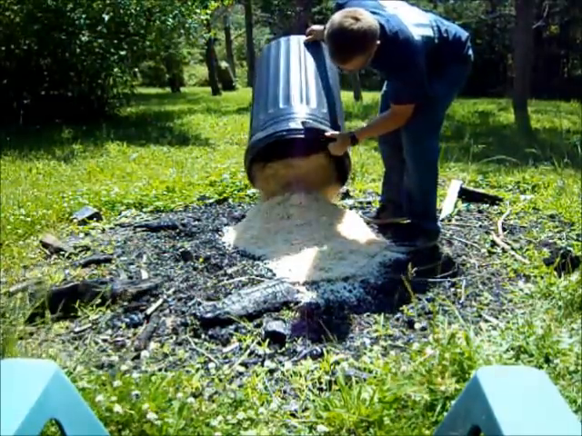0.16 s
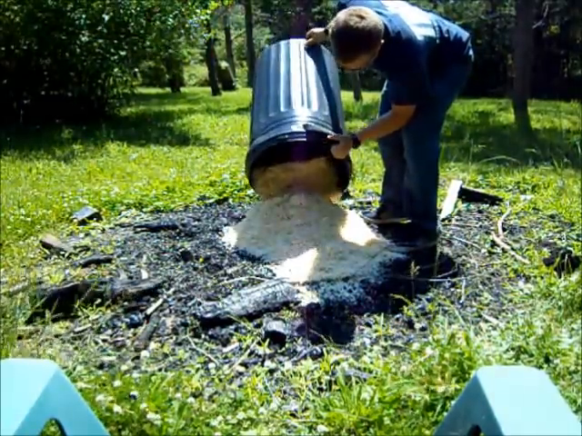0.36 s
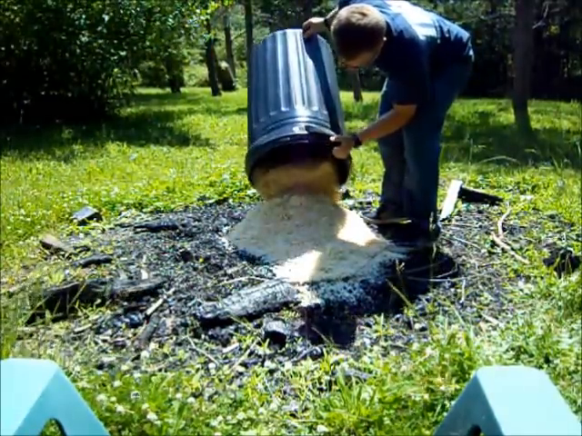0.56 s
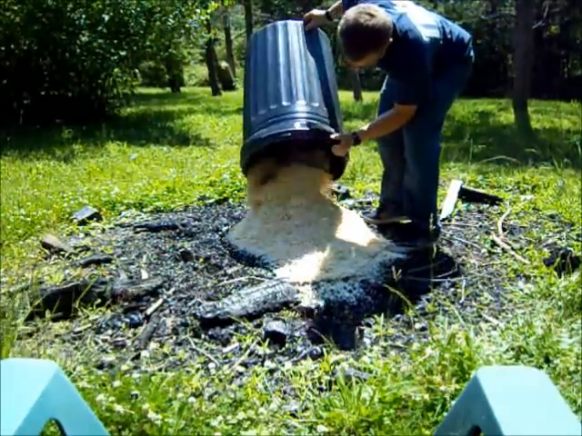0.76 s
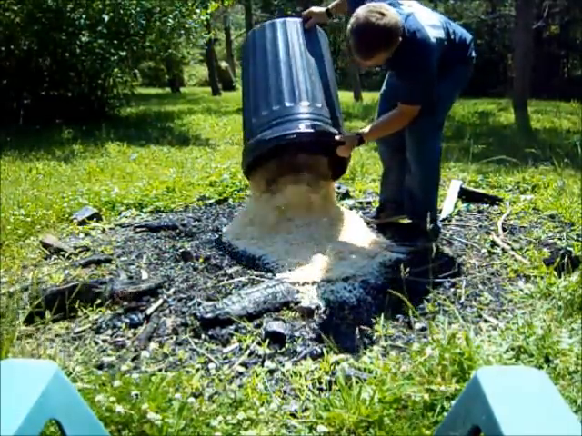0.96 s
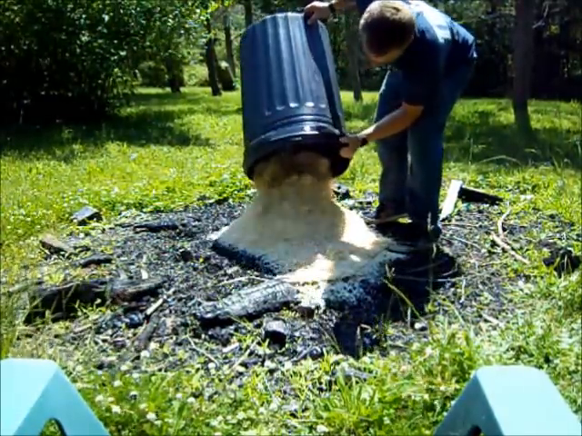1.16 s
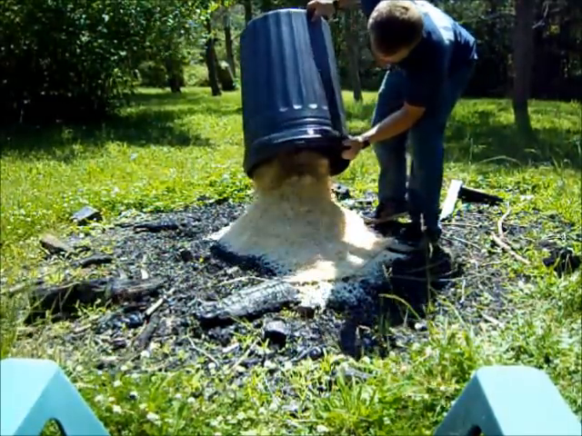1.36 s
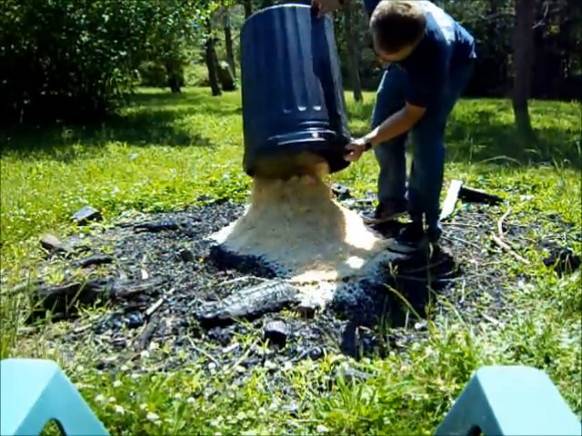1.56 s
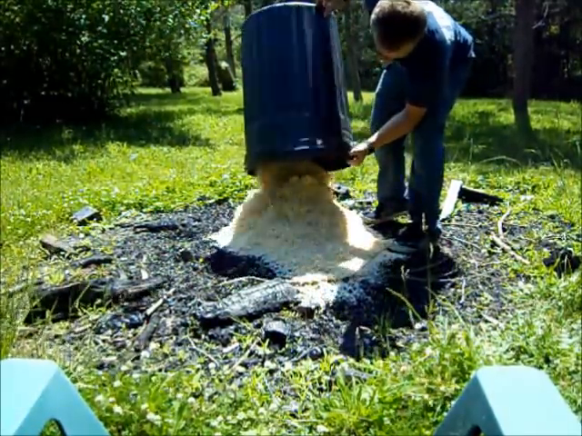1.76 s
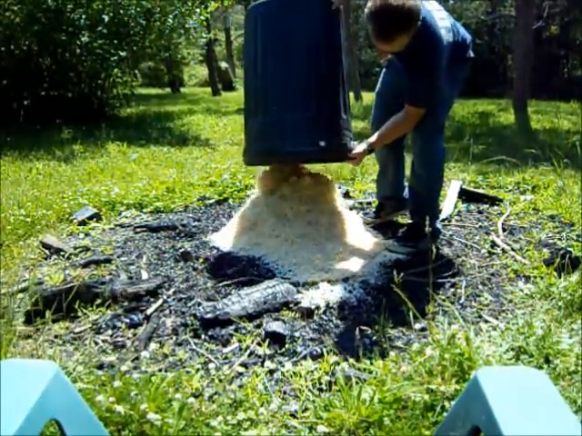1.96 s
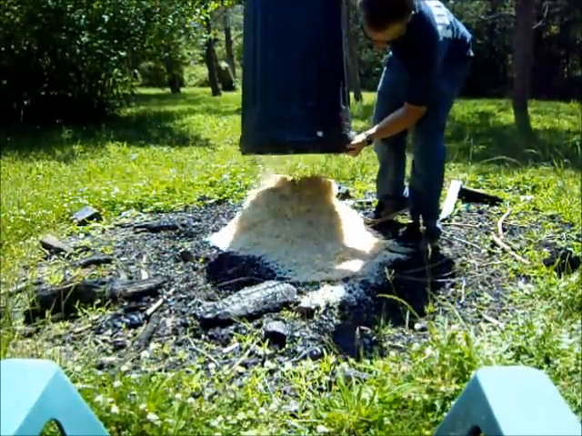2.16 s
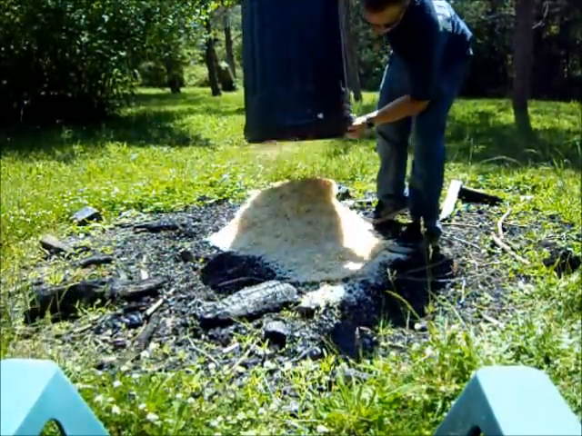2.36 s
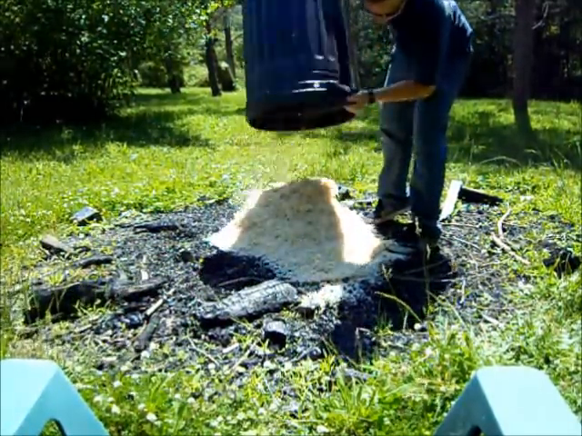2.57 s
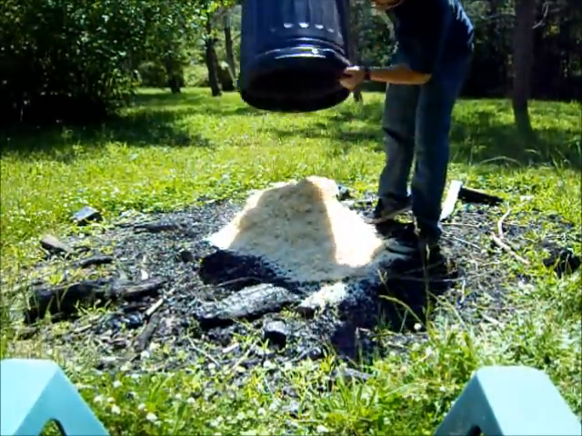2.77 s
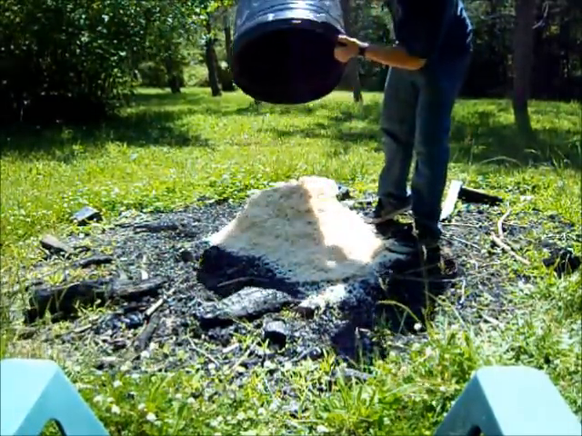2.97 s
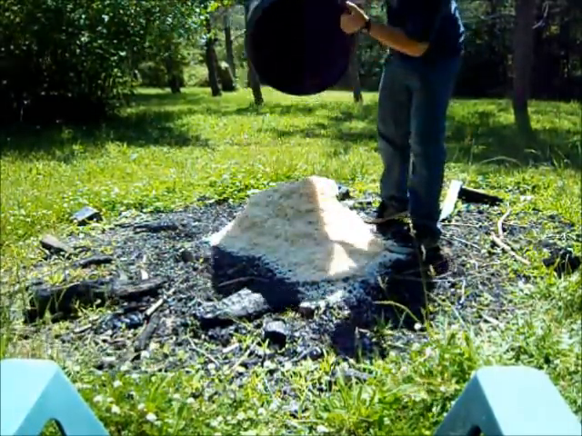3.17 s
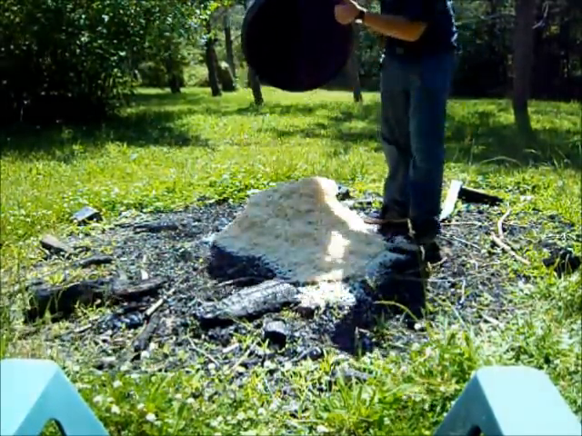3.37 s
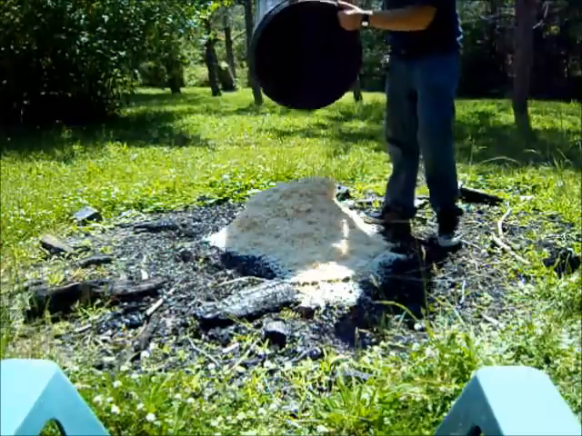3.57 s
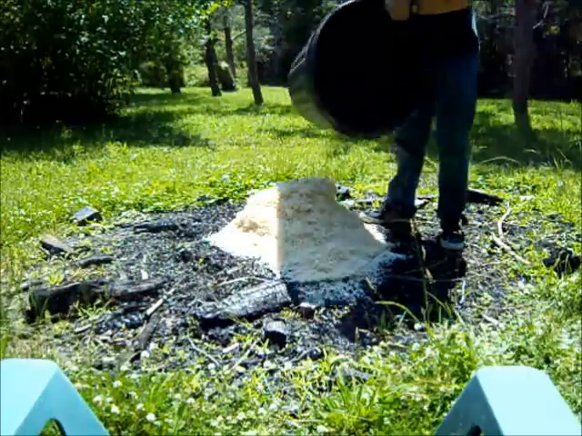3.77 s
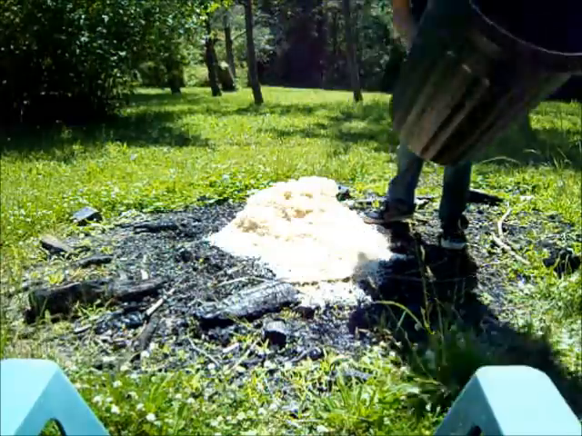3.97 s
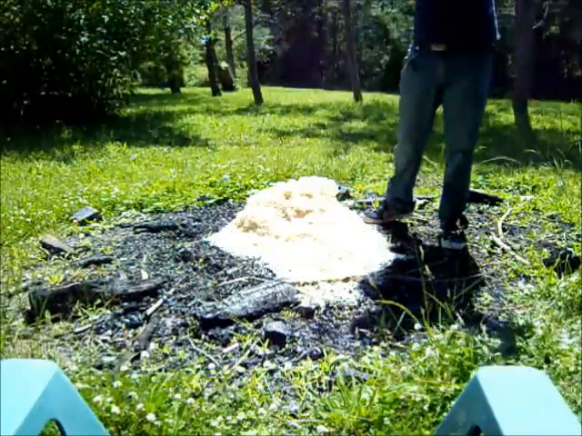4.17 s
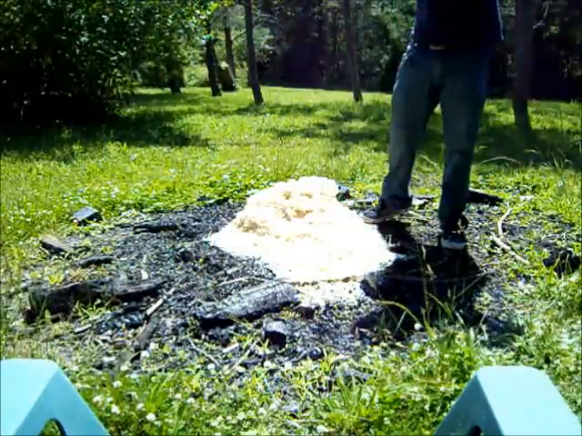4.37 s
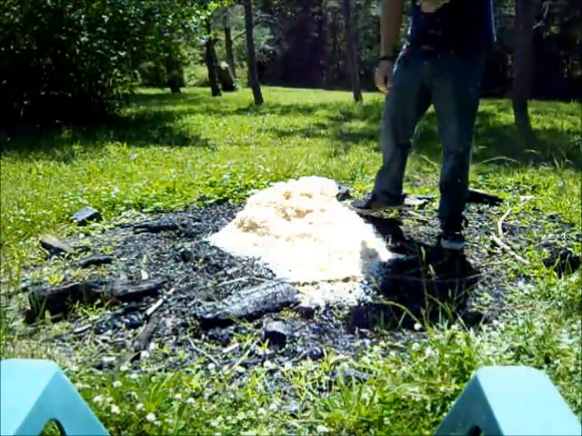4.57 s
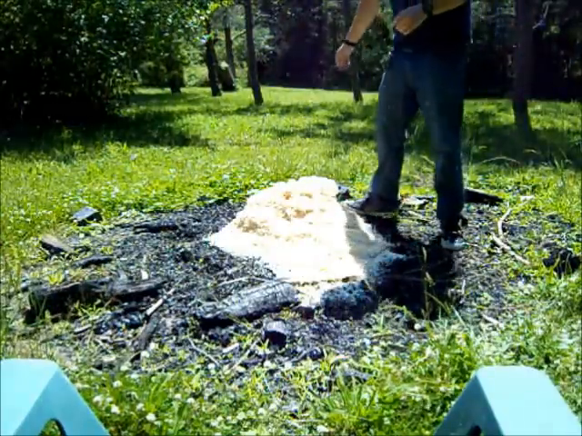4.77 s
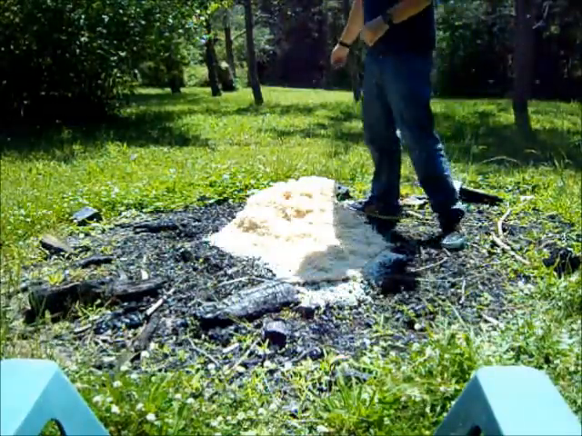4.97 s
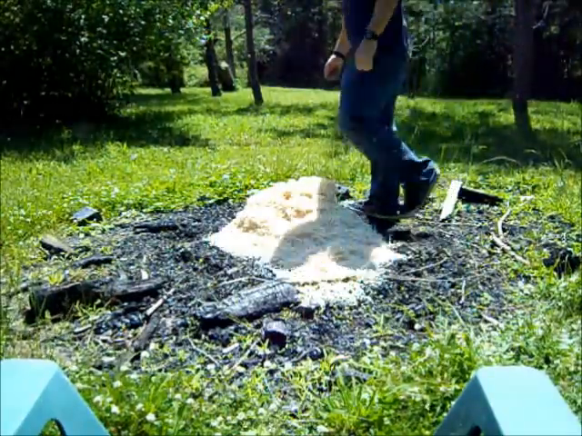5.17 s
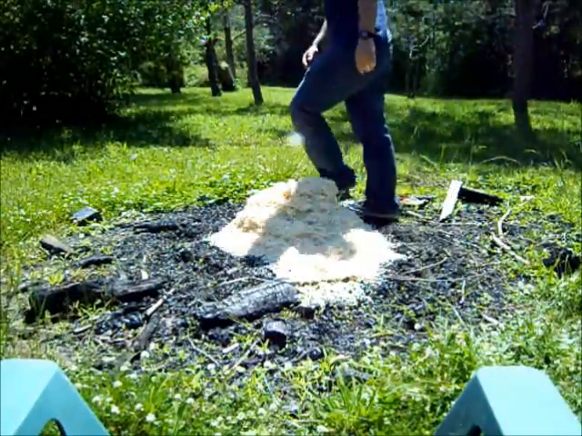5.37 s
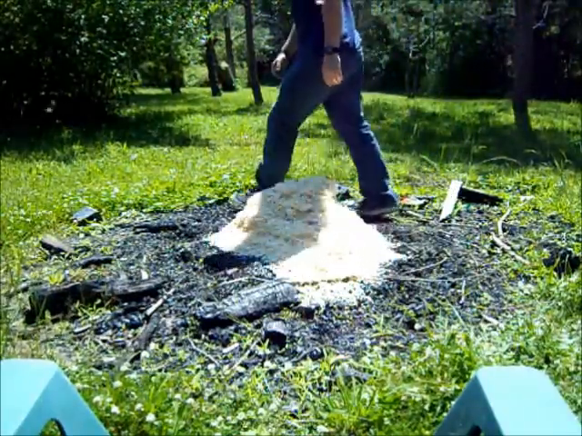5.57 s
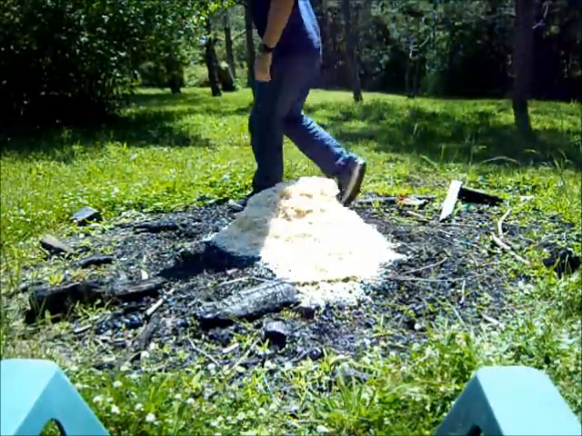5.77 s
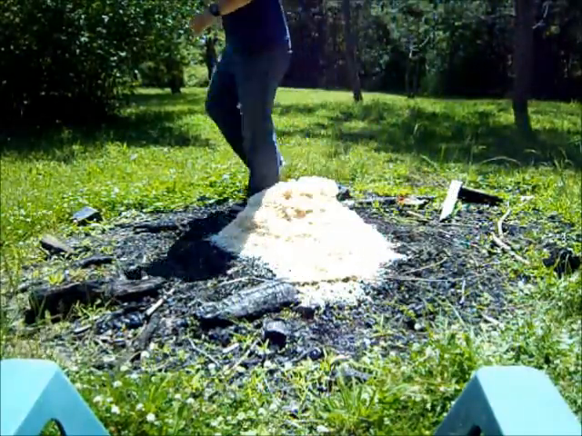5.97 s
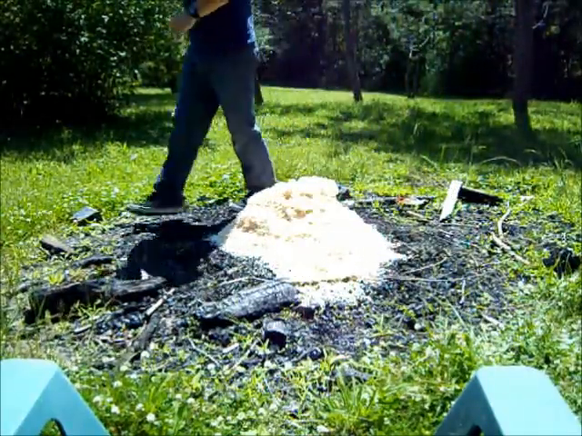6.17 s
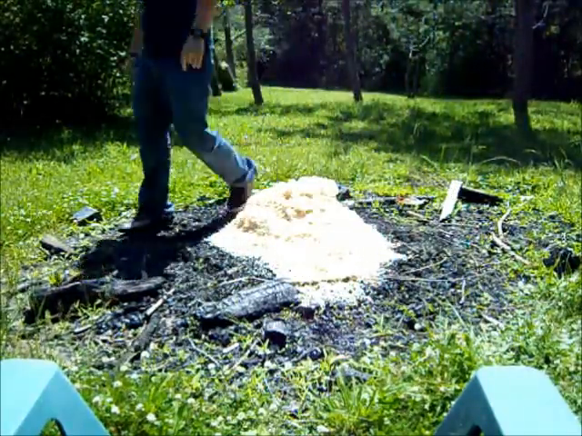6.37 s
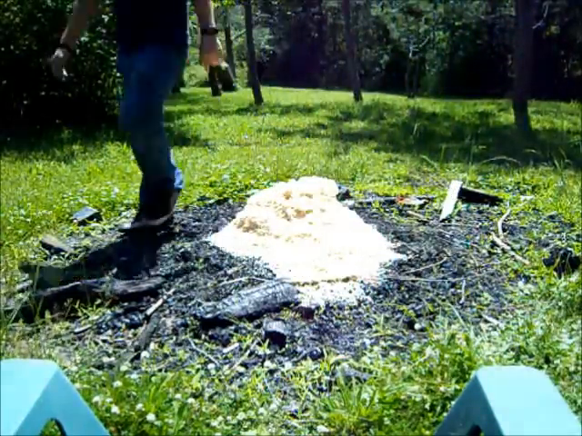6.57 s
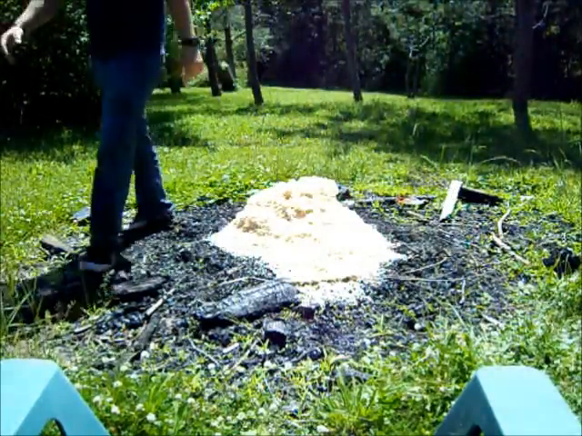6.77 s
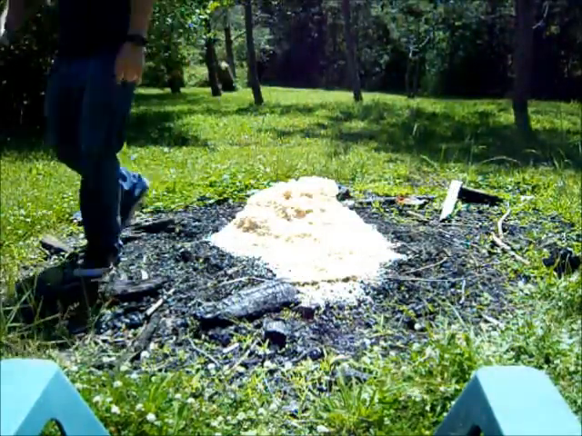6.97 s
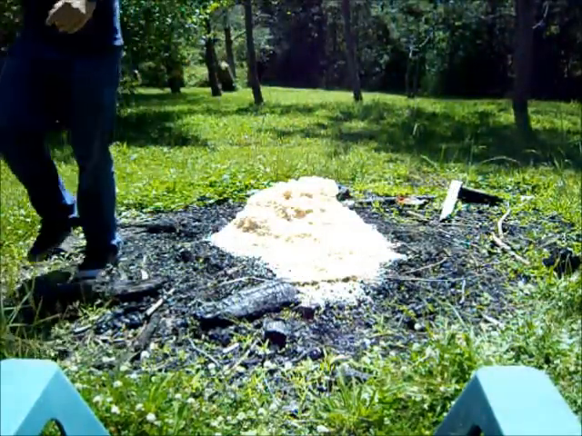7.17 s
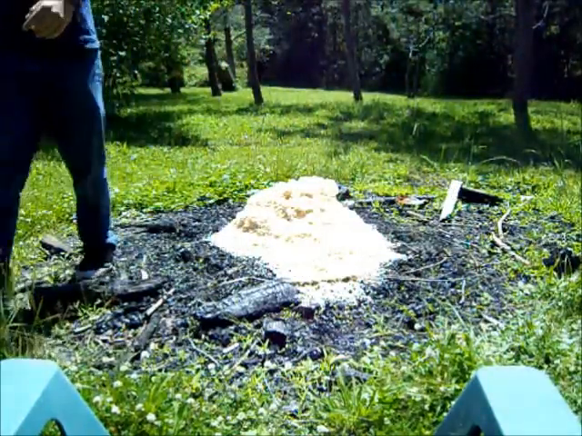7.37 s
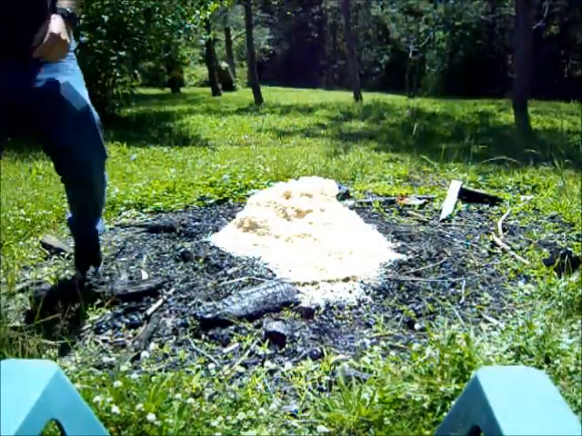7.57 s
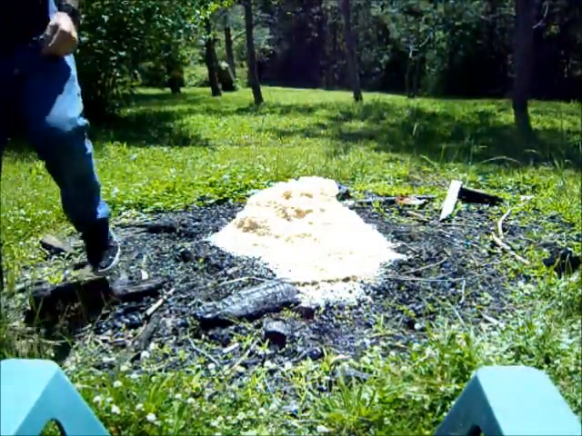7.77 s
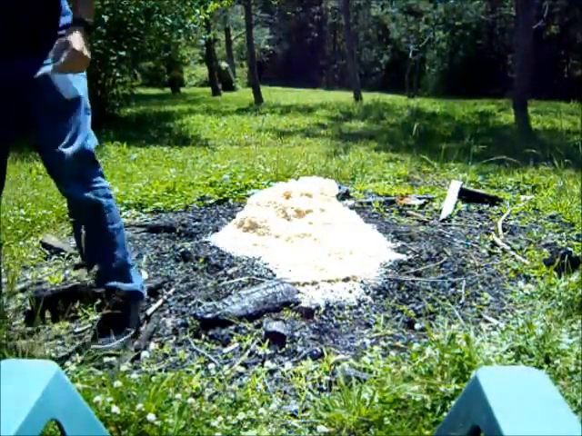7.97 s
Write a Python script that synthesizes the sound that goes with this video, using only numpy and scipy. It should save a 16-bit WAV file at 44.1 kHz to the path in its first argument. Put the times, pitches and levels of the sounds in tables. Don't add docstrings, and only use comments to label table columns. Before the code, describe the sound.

Outdoors by a wood, wind thumps and flutters on a small camera microphone while birds whistle, trill and rasp. A tossed empty plastic bin briefly squeaks against a chair, then lands twice with deep hollow booms and grassy swishes. The air drops quiet over a faint distant road hum, then shoes crunch charcoal and snap twigs, coming closer.

```python
import sys
import numpy as np
from scipy import signal
from scipy.fft import rfft, irfft, next_fast_len
from scipy.io import wavfile
from scipy.ndimage import uniform_filter1d, map_coordinates

SR = 44100
rng = np.random.default_rng(int(sys.argv[2]) if len(sys.argv) > 2 else 0)


def int16_out(signal):
    q = np.round(np.clip(np.atleast_2d(signal).T, -1, 1) * 32767)
    wavfile.write(sys.argv[1], SR, q.astype(np.int16))


def gain_from_db(level_db):
    decades = np.asarray(level_db, float) / 20
    return 10 ** decades


N = 354123
TIME = np.arange(N) / SR

# (time [s], level [dB])
BREEZE = [(0, -53), (.45, -54), (1.05, -47), (1.6, -50.5), (2.4, -48), (3.98, -43.5), (4.55, -45.5),
          (4.68, -52.5), (4.8, -56), (5.45, -58.5), (6.29, -60.5), (6.38, -52.5), (6.8, -50.5), (7.02, -49),
          (7.6, -44.5), (8.03, -46.5)]
CALM_DB = -50


def unit(x):
    return x / np.sqrt(np.mean(x ** 2) + 1e-20)


def curves(rows):
    s, *columns = np.transpose(rows)
    gate = np.clip(np.minimum(TIME - s[0], s[-1] - TIME) / .002, 0, 1)
    return [np.interp(TIME, s, column) for column in columns] + [gate]


def wobble(rate):
    return map_coordinates(rng.standard_normal(int(N * rate / SR) + 4), [TIME * rate])


def filtered(x, response):
    m = next_fast_len(len(x) + SR // 4)
    hz = np.fft.rfftfreq(m, 1 / SR) + 1
    return irfft(rfft(x, m) * response(hz), m)[:len(x)]


def rush(spectrum):
    f, db = np.transpose(spectrum)
    return unit(filtered(rng.standard_normal(N), lambda hz: gain_from_db(np.interp(np.log(hz), np.log(f), db))))


def peak(hz, centre_hz, width_hz):
    return 1j * hz * width_hz / (centre_hz ** 2 - hz * hz + 1j * hz * width_hz)


def add(track, s, sound):
    part = track[max(round(s * SR), 0):][:len(sound)]
    part += sound[:len(part)]


def press(rise, t60, db):
    t = np.arange(SR // 3) / SR
    return np.clip(t / rise, 0, 1) * gain_from_db(db - 60 * np.maximum(t - rise, 0) / t60)


def swell(rows):
    out = np.zeros(N)
    for s, length, hz, width_hz, db in rows:
        u = np.arange(4000 + SR // 3) / SR / length
        grain = unit(filtered(rng.standard_normal(len(u)), lambda f: peak(f, hz, width_hz) ** 2))
        add(out, s, gain_from_db(db) * np.sin(np.pi * np.clip(u, 0, 1) ** 0.79) ** 0.29 * grain)
    return out


def air():
    # (frequency [Hz], density [dB per Hz])
    leaf_colour = [(88, -33.5), (150, -0.5), (400, -4.5), (874, -5), (1490, -7.5), (3900, -9), (7460, -12),
                   (10400, -57)]
    level_db, _ = curves(BREEZE)
    hiss = rush(leaf_colour)
    low = filtered(hiss, lambda hz: 1 / (1 + (hz / 2500) ** 2))
    shine_db = -1 + 0.17 * (level_db - CALM_DB)
    return gain_from_db(level_db + 8 + 0.68 * wobble(7)) * (low + gain_from_db(shine_db) * (hiss - low))


def traffic():
    # (frequency [Hz], density [dB per Hz])
    road_colour = [(8.8, -36), (15, 3.5), (48, -2), (108, -2.5), (168, -11), (250, -15.5), (320, -44.5),
                   (550, -120)]
    level_db, _ = curves(BREEZE)
    gate = np.clip((TIME - 4.6) / .05, 0, 1)
    phase = 2 * np.pi * np.cumsum(112 + 2.3 * wobble(7.2)) / SR
    engine = np.sin(phase) * gain_from_db(2.5 + 1.9 * wobble(15))
    engine_db = -51 + 1.8 * (level_db - CALM_DB)
    return gate * (gain_from_db(level_db + 7) * rush(road_colour) + gain_from_db(engine_db) * engine)


def wind():
    # (time [s], strength [dB])
    gusts = [(0, -26.5), (.3, -33), (.6, -30.5), (.84, -25.5), (1.01, -26), (1.2, -21.5), (1.58, -32),
             (1.87, -24.5), (2.2, -28.5), (2.55, -21.5), (2.81, -23.5), (3.07, -25.5), (3.33, -29.5),
             (3.58, -24), (3.97, -27), (4.25, -36), (4.5, -35), (4.61, -18.5)]
    # (frequency [Hz], density [dB per Hz])
    heave_colour = [(7.1, -48.5), (12, 1), (38, 0), (90, -6.5), (120, -40.5), (200, -120)]
    flutter_colour = [(30, -43), (60, -0.5), (120, 1), (250, -14.5), (450, -39), (900, -54)]
    # (time [s], level [dB], swing half width [ms])
    pops = [(0.01, -28.5, 3.4), (0.593, -19.5, 1), (0.679, -17.5, 1.53), (0.772, -26.5, 0.98),
            (0.818, -25.5, 1), (0.896, -19.5, 1.25), (0.957, -21.5, 0.97), (1.078, -21.5, 1.83),
            (1.135, -20, 0.93), (1.177, -6.5, 1.55), (1.19, -8, 0.59), (1.264, -18.5, 1.07),
            (1.342, -23, 1.45), (1.641, -24.5, 1.74), (1.685, -24, 1.4), (1.776, -24.5, 0.77),
            (1.843, -25.5, 0.68), (1.888, -11, 0.78), (2.06, -26, 1.5), (2.463, -21.5, 1.37),
            (2.512, -13.5, 2.6), (2.551, -13, 1.78), (2.586, -21.5, 1.1), (2.673, -18.5, 1.9),
            (2.701, -16.5, 2.06), (2.961, -27.5, 1.13), (3.093, -18, 2.1), (3.544, -19.5, 2.3),
            (3.597, -12.5, 1.83), (3.83, -15.5, 0.93)]
    ripples = [0.283, .386, 0.507, .603, .92, .975, 1.004, 1.246, 1.279, 1.669, 2.311, 2.434, 2.688, 2.759,
               2.825, 2.872, 3.314, 3.558, 3.639, 3.719]
    # (time [s], level [dB], swing half width [ms])
    lurches = [(0.099, -17, 3.6), (.155, -18, 2.5), (.392, -18, 2.1), (.51, -20, 2.9), (.668, -12.5, 3),
               (.775, -11, 3.1), (.815, -11, 2.6), (.893, -12, 3.3), (1.178, -7, 3.5), (1.335, -16, 3.5),
               (1.63, -17, 3.5), (1.77, -11.5, 3.1), (1.882, -9, 3), (1.93, -14, 3), (2.451, -15, 3),
               (2.548, -7, 3.9), (2.682, -9, 2.2), (3.025, -14, 3.5), (3.188, -10.5, 3.3),
               (3.312, -13, 2.8), (3.54, -15, 3.5), (3.662, -13.5, 3), (3.715, -13, 2.9), (3.895, -17, 4.6)]
    gust_db, gate = curves(gusts)
    flutter_db = -5 + gust_db + 0.26 * (gust_db + 33.5)
    heave = unit(gain_from_db(3.1 * wobble(9)) * rush(heave_colour))
    flutter = unit(gain_from_db(3.2 * wobble(20) + 5.06 * wobble(45)) * rush(flutter_colour))
    out = gate * (gain_from_db(gust_db) * heave + gain_from_db(flutter_db) * flutter)

    eddies = pops + [(s, gust_db[round(s * SR)] - 2.5, 1.34) for s in ripples]
    eddies = eddies + [(s + .004, db - 13.5, width) for s, db, width in lurches]
    t_ms = np.arange(SR // 10) / SR * 1000 - 50
    for (s, db, width_ms), luck in zip(eddies, rng.uniform(-0.98, 1, (len(eddies), 5, 3))):
        luck[0, :2] = 0
        offset, loss, turn = luck.T[:, :, None]
        half_length_ms = max(6.97 - 0.11 * (db + 20), 2)
        width = max(width_ms, .3) * (1 + 0.99 * np.abs(offset))
        u = (t_ms - 1.807 * half_length_ms * offset) / width
        swing_level = gain_from_db(-14 * np.abs(loss) - 3 * np.abs(offset))
        swings = swing_level * np.cos(1.2 * u + np.pi * turn) / (1 + u * u) ** 2.09
        burst = swings.sum(axis=0)
        drive = gain_from_db(db + 13.0) * (burst - burst.mean())
        add(out, s - 50 / 1000, 0.77 * np.tanh(drive))
    return out


def woods(x):
    t = np.arange(SR) / SR
    tail = rng.standard_normal(SR) * gain_from_db(-60 * t / 0.67) * (1 - np.exp(-t / 0.0071))
    tail /= np.linalg.norm(tail)
    tail[[370, 820]] += [.5, .3]
    return signal.fftconvolve(x, tail)[:N]


def glide(rows, waver_hz=0, waver_db=0):
    s, hz, db = np.transpose(rows)[:3]
    t = np.arange(s[0], s[-1], 1 / SR)
    shake = uniform_filter1d(rng.standard_normal((2, SR // 2 + SR // 8)), 150, axis=1)
    shake = shake[:, :len(t)] * np.sqrt(150)
    edge = np.clip(np.minimum(t - s[0], s[-1] - t) / .002, 0, 1)
    phase = 2 * np.pi * np.cumsum(np.interp(t, s, hz) + waver_hz * shake[0]) / SR
    return edge * gain_from_db(np.interp(t, s, db) + 5.0 + waver_db * shake[1]) * np.sin(phase)


def whistles():
    # (time [s], high note length [s], high pitch [Hz], high level [dB], low level [dB])
    songs = [
        (1.066, 0.043, 6940, -38, -28.5),
        (1.466, 0.061, 6740, -37.5, -31),
        (1.78, .078, 6680, -31.5, -32.5),
    ]
    # (time [s], pitch [Hz], level [dB])
    low_note = [
        (.008, 5750, -11),
        (.015, 5570, -5),
        (.034, 5480, -1),
        (.044, 4000, -9.5),
    ]
    # (time [s], length [s], start pitch [Hz], end pitch [Hz], level [dB])
    chips = [(2.369, 0.0056, 7500, 6340, -38), (2.426, .01, 5450, 7540, -37),
             (2.771, 0.0046, 3070, 2090, -30), (2.93, 0.034, 3810, 3550, -45),
             (2.976, 0.021, 2110, 2855, -37.5), (3.051, .022, 6050, 6820, -36),
             (3.067, .02, 6800, 7270, -35.5), (3.16, .014, 3780, 3335, -31.5),
             (3.172, 0.026, 3524, 3500, -43), (3.405, 0.028, 7240, 7100, -43),
             (3.44, .018, 6320, 5930, -30.5), (3.45, 0.014, 5940, 5040, -36.5),
             (3.506, 0.027, 3116, 3370, -37), (3.53, 0.025, 3310, 3360, -30.5),
             (3.567, 0.029, 3330, 3370, -35), (3.607, .065, 3430, 3360, -38.5),
             (3.687, .13, 3365, 3360, -44.5)]
    notes = []
    for s, long, hz, db, low_db in songs:
        high = [(s, hz + 430, db - 19), (s + 0.39 * long, hz + 40, db),
                (s + 0.73 * long, hz, db), (s + long, hz - 60, db - 18)]
        notes.append(high + [(s + long + late, low_hz, low_db + g) for late, low_hz, g in low_note])
    for s, long, a, b, db in chips:
        notes.append([(s, a, db - 6.5), (s + 0.5 * long, a + 0.5 * (b - a), db), (s + long, b, db - 2)])
    return notes


def trill():
    # (time [s], pitch [Hz], level [dB], beat rate [per s])
    beaten_tone = [(1.935, 3120, -47, 70), (1.98, 3105, -34, 70), (2.04, 3160, -38, 70),
                   (2.06, 3115, -33, 65), (2.09, 3125, -36, 58), (2.27, 3135, -36, 58),
                   (2.376, 3190, -35, 58)]
    hz, db, beats, gate = curves(beaten_tone)
    turn = np.pi * np.cumsum(beats * (gate > 0)) / SR
    phase = 2 * np.pi * np.cumsum(hz - 55 * np.sin(2 * turn) + 30 * wobble(90)) / SR
    return gate * gain_from_db(db + 6.5 + 2.4 * wobble(70)) * np.abs(np.sin(turn)) ** 0.98 * np.sin(phase)


def birds():
    # (time [s], length [s], centre [Hz], width [Hz], level [dB])
    rasps = [(1.105, .02, 6300, 900, -42), (1.52, .025, 5700, 1100, -39), (1.856, .03, 5600, 1100, -35),
             (1.885, .03, 5300, 400, -41), (1.9, .14, 5450, 450, -44), (2.47, .097, 2500, 950, -44),
             (2.64, .22, 3130, 400, -45), (2.66, .22, 4600, 800, -38), (2.68, .14, 3950, 440, -43),
             (3.07, .06, 6700, 600, -39), (3.3, .008, 2600, 1000, -37), (3.41, .03, 7100, 500, -43),
             (3.425, .03, 6500, 900, -41), (3.45, .04, 5600, 1100, -36), (3.46, .04, 7100, 700, -42),
             (3.47, .12, 5950, 600, -41), (3.68, .008, 5000, 4000, -37), (3.71, .07, 5600, 900, -43)]
    calls, near = swell(rasps), trill()
    for note in whistles():
        add(calls, note[0][0], glide(note, waver_hz=28, waver_db=1.5))
    return calls + near + gain_from_db(2.5 * wobble(70)) * woods(gain_from_db(-5) * calls + gain_from_db(-9) * near)


def crunches():
    # (time [s], rise [s], level [dB], thump share [dB])
    steps = [(6.33, 0.0018, -46, 1.5), (6.346, 0.012, -42, -10), (6.405, 0.015, -49, -15),
             (6.574, 0.0038, -58, 13.5), (6.826, 0.01, -39.5, -3.5), (6.873, 0.0052, -44.5, 12),
             (6.918, 0.0039, -42.5, 8), (6.942, 0.0021, -45, 7.5), (6.968, .002, -43, 13),
             (7.001, 0.019, -51, 8), (7.05, 0.018, -46, 0), (7.256, .003, -47, 4.5),
             (7.4, 0.096, -40.5, -3.5), (7.489, 0.0024, -59, 10), (7.535, 0.03, -30.5, -12),
             (7.67, 0.038, -35.5, -27), (7.71, 0.016, -43, -23), (7.86, 0.031, -50, -5.5),
             (7.985, 0.018, -42.5, -1.5)]
    grains = rng.standard_normal(N) * gain_from_db(2 * wobble(150) + 4 * wobble(900))
    bright = unit(filtered(grains, lambda hz: peak(hz, 3700, 6000) * (hz < 8000)))
    dull = unit(filtered(grains, lambda hz: peak(hz, 970, 630)))
    weight, thump = np.zeros((2, N))
    for s, rise, db, thump_db in steps:
        t60 = 0.12 + 7.2 * rise
        add(weight, s, press(rise, t60, db))
        add(thump, s, press(rise, t60, db + thump_db))
    return weight * bright + thump * dull


def snaps():
    # (time [s], peak level [dB], ring [Hz])
    twigs = [(5.3457, -31, 5600), (6.3332, -32.5, 3180), (6.3128, -38, 2310), (6.3585, -33, 2300),
             (6.366, -27.5, 2400), (6.372, -35.5, 5570), (6.384, -29, 2250), (6.4072, -31, 2450),
             (6.4253, -25.5, 2600), (6.433, -30.5, 2400), (6.4687, -29.5, 2820), (6.83, -35, 6100),
             (6.837, -35, 6000), (6.848, -31, 3000), (6.86, -27.5, 5600), (6.881, -29.5, 3600),
             (6.886, -21.5, 2900), (6.901, -21.5, 2150), (6.9176, -32, 5600), (6.935, -28, 3200),
             (6.944, -20.5, 3200), (6.95, -29, 2500), (6.9684, -15, 3340), (6.9748, -19, 3450),
             (6.9764, -17.5, 2850), (6.9823, -16.5, 3600), (7.003, -31.5, 5700), (7.0977, -22.5, 3370),
             (7.1182, -24, 3830), (7.2605, -21.5, 2770), (7.417, -22, 6270), (7.4599, -23.5, 6500),
             (7.508, -24.5, 4100), (7.5446, -14, 3920), (7.5672, -28, 3000), (7.594, -13, 7140),
             (7.694, -16, 6980), (7.7367, -30, 3240)]
    out, t = np.zeros(N), np.arange(SR // 40) / SR
    for s, db, hz in twigs:
        splinter = unit(filtered(rng.standard_normal(len(t)), lambda f: peak(f, hz, 2500)))
        crack = gain_from_db(-60 * t / 0.0082) * (0.78 * np.sin(2 * np.pi * hz * t) + 0.61 * splinter)
        body = gain_from_db(-15 - 60 * t / 0.0094) * np.sin(2 * np.pi * 720 * t)
        add(out, s, gain_from_db(db - 1.5) * (crack + body))
    return out


def knocks():
    # (time [s], peak level [dB], ring [Hz])
    lumps = [(6.332, -28, 440), (6.366, -31, 850), (6.577, -31, 1110), (6.829, -33, 458), (6.865, -24, 840),
             (6.885, -24, 905), (6.917, -31, 1210), (6.942, -18, 680), (6.975, -29, 660), (6.982, -15, 650),
             (6.984, -22, 900), (7.258, -28, 1020), (7.486, -20, 498), (7.758, -34, 428)]
    out, t = np.zeros(N), np.arange(SR // 40) / SR
    for s, db, hz in lumps:
        level = gain_from_db(db - 1.5 - 60 * t / .016) * (1 - np.exp(-t / .0006))
        add(out, s, level * np.sin(2 * np.pi * hz * t))
    return out


def footsteps():
    out = crunches() + snaps() + knocks()
    bounce = np.interp(TIME, [7.2, 7.45], [.55, .2])
    return out + bounce * filtered(out, lambda hz: np.exp(-2j * np.pi * hz / 3100))


def chair():
    # (frequency [Hz], width [Hz], level [dB])
    chair_modes = [(1890, 27, -2.5), (2490, 40, -3), (3240, 29, -8), (4230, 88, -5), (5660, 27, -10.5)]
    # (time [s], level [dB])
    drag = [(3.998, -42), (4.006, -29), (4.012, -26), (4.015, -14), (4.023, -16), (4.03, -23), (4.05, -38)]
    db, gate = curves(drag)

    def body(hz):
        modes = sum((-1) ** k * gain_from_db(g) * peak(hz, c, 3.5 * w) for k, (c, w, g) in enumerate(chair_modes))
        return .16 * peak(hz, 3000, 4500) + modes

    return gate * gain_from_db(db) * unit(filtered(rng.standard_normal(N) * gain_from_db(0.7 * wobble(500)), body))


def grass():
    # (time [s], rise [s], t60 [s], level [dB], tilt [dB per octave])
    swishes = [(4.065, 0.011, 0.19, -29.5, -1), (4.091, 0.015, 0.11, -25.5, 3),
               (4.4, 0.036, 0.67, -36.5, 2), (4.58, 0.013, 0.15, -18, -1.3), (4.6, 0.0056, 0.091, -14, -16),
               (4.639, 0.021, 0.17, -34, -4), (5.018, 0.018, 0.074, -37, -3.5),
               (5.0464, 0.00026, 0.078, -16, -8.5), (5.0842, 0.00027, 0.005, -29, -5.5),
               (5.186, 0.0087, 0.06, -41.5, -3.5), (5.303, 0.0054, 0.13, -31, -9.5),
               (5.329, 0.018, 0.09, -41.5, -4), (5.54, 0.012, .1, -47.5, -3.5)]
    out = np.zeros(N)
    for s, rise, t60, db, tilt_db in swishes:
        colour = lambda hz: gain_from_db(tilt_db * np.log2(hz / 2000)) / (1 + (650 / hz) ** 3) * (hz < 8000)
        add(out, s, press(rise, t60, db) * unit(filtered(rng.standard_normal(SR // 3), colour)))
    return out


def rim_taps():
    # (time [s], peak level [dB], ring [Hz], t60 [s])
    taps = [
        (3.9693, -19, 795, 0.018),
        (3.974, -23, 620, .02),
        (4.6077, -14, 281, .07),
        (4.6216, -8.5, 260, .05),
        (5.0469, -5.5, 1160, .005),
        (5.0466, -11.5, 2300, 0.0076),
        (5.0525, -12, 1400, 0.018),
    ]
    out, t = np.zeros(N), np.arange(SR // 3) / SR
    for s, db, hz, t60 in taps:
        add(out, s, gain_from_db(db - 60 * t / t60) * np.sin(2 * np.pi * hz * t))
    return out


def wall_modes():
    # (frequency [Hz], level [dB], t60 [s])
    walls = [(38, -4.5, 0.49), (178, -2.5, 0.17), (205.1, -3.5, 0.38), (299, 1, 0.14), (378.5, -11, 0.25),
             (528, 0.5, 0.09), (630, 0.5, 0.068), (750, -0.5, .1), (850, -7, 0.049), (980, -5.5, .06),
             (1400, -3.5, .06), (1630, -4, .06)]
    # (time [s], level [dB], ring time factor [1], hardness [Hz])
    blows = [
        (4.599, -10.5, 0.41, 1300),
        (4.606, -11, 0.64, 603),
        (4.618, -23, 0.63, 330),
        (4.661, -29, 1.05, 700),
        (4.7, -22.5, 0.52, 200),
        (5.0464, -18.5, 1.2, 800),
        (5.075, -21, 1.05, 330),
        (5.13, -33.5, 1.3, 350),
        (5.303, -34.5, 0.93, 1300),
        (5.325, -29.5, 0.62, 500),
    ]
    out, t = np.zeros(N), np.arange(SR // 3) / SR
    main_hz, main_db, main_t60 = np.transpose(walls)[:, :, None]
    for (s, db, ring, hard_hz), luck in zip(blows, rng.uniform(0, 1, (len(blows), 3, 32, 1))):
        crowd_hz = 120 * 12 ** luck[0]
        hz = np.r_[main_hz, crowd_hz]
        t60 = ring * np.r_[main_t60, 75 / crowd_hz]
        start_db = np.r_[main_db + 8 * (luck[1, :len(walls)] - .5), -16 + 10 * luck[1]]
        level = gain_from_db(db + start_db - 60 * t / t60) / (1 + (hz / hard_hz) ** 2)
        modes = level * np.sin(2 * np.pi * (hz * t + np.r_[0 * main_hz, luck[2]]))
        add(out, s, modes.sum(axis=0) * (1 - np.exp(-t / 0.00091)))
    return out


def boom(rise, hold, db, fall):
    t = np.arange(SR * 3 // 5) / SR
    after = np.maximum(t - rise - hold, 0)
    decay = gain_from_db(-fall * after) + gain_from_db(-21 - 0.24 * fall * after)
    level = gain_from_db(db + 3.5 - 17 * np.clip(1 - t / rise, 0, 1)) * decay
    phase = 2 * np.pi * np.cumsum(89.56 + 14.4 * np.exp(-t / .11)) / SR
    floor = gain_from_db(-14.5) * np.sin(2 * np.pi * 122.2 * t + 3.1)
    return level * (np.sin(phase) + floor)


def plastic_bin():
    # (time [s], length [s], centre [Hz], width [Hz], level [dB])
    rubs = [
        (3.22, 0.41, 618, 150, -44.5),
        (3.7, 0.1, 630, 194.4, -39.5),
        (3.972, 0.027, 680, 704, -30),
        (4.012, 0.032, 312, 80.6, -27.5),
        (4.0, 0.02, 790, 300, -23.5),
        (4.015, 0.016, 970, 300, -29),
    ]
    # (time [s], rise [s], hold [s], level [dB], fall [dB per s])
    landings = [
        (4.04, 0.019, 0.022, -33.5, 257),
        (4.602, 0.016, 0.056, -11, 416),
        (5.0473, 0.028, 0.0086, -7.5, 181.5),
        (5.329, 0.034, .01, -44.5, 118),
    ]
    out = swell(rubs) + rim_taps() + wall_modes() + grass()
    for s, *shape in landings:
        add(out, s, boom(*shape))
    return out


def scene():
    return (air() + traffic() + wind() + birds() + footsteps() + chair() + plastic_bin())[None]


def low_pass(x):
    return signal.sosfilt(signal.butter(12, 8120, fs=SR, output="sos"), x)


def record(dry):
    narrow = filtered(dry[0], lambda hz: 1 / (1 + (hz / 7750) ** 60) * (hz < 8150))
    mix = np.clip(narrow, -1, 1)[None]
    return low_pass(mix)


dry = scene()
out = record(dry)
int16_out(out)
```